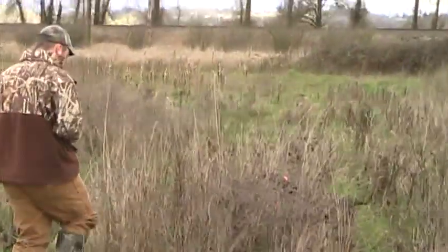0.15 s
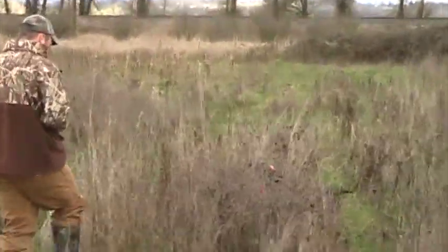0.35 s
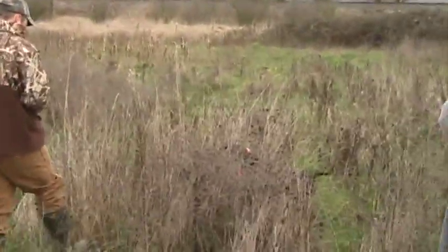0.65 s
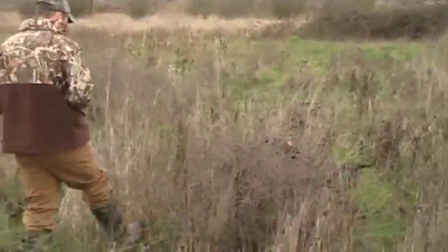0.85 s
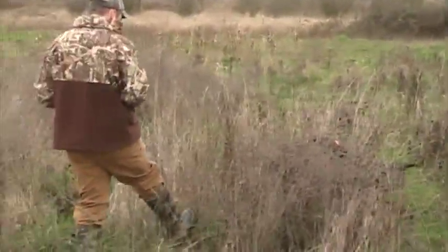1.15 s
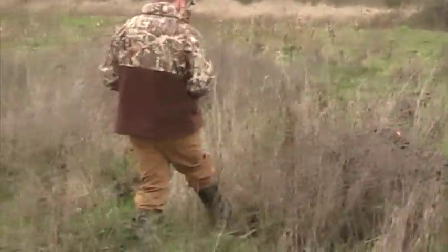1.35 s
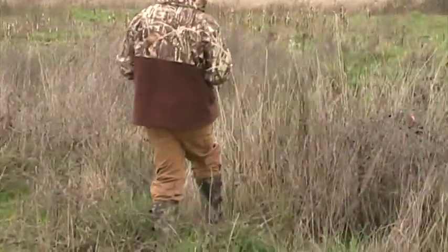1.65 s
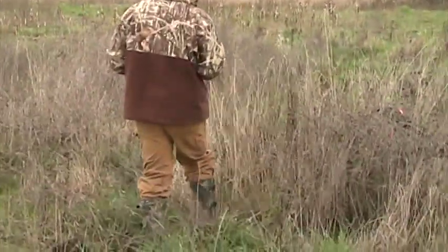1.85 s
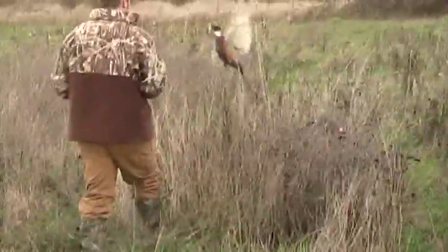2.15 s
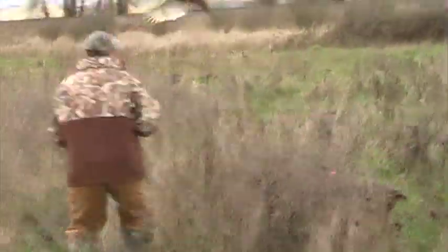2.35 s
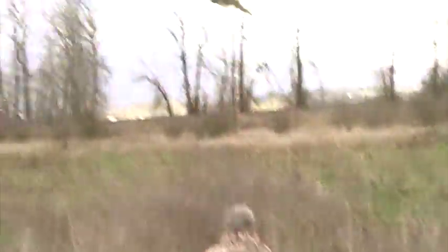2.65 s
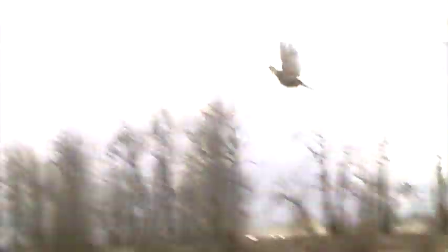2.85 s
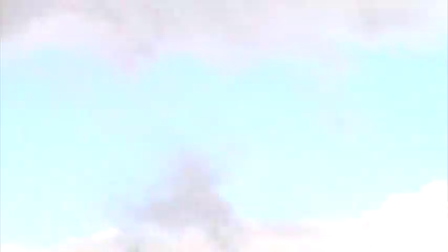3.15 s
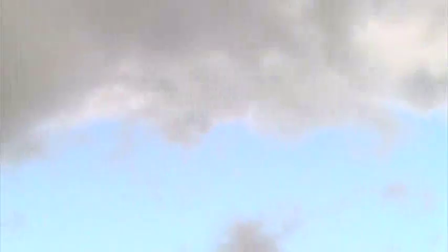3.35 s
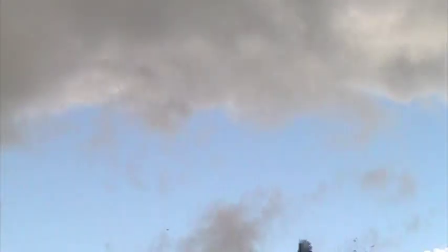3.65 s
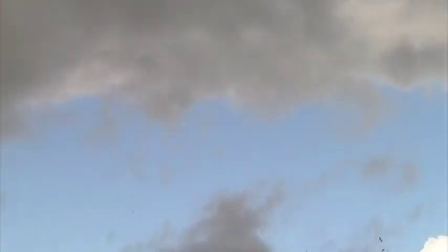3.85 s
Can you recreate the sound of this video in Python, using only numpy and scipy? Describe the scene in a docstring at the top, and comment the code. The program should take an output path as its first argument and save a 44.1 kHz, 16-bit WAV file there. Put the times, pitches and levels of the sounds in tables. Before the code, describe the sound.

Shotgun fires loudly in an open field, following crunching stems, a flushing pheasant and buffeting wind

```python
"""Pheasant flush and shotgun in dry grass

An open field with far hum and hiss: shaped noise, under a far small bird of gliding tones.
Close to the microphone a hunter wades through dry grass: grained noise swells and resonant snaps.
A pheasant thrashes free and beats away, each wing stroke whistling, swishing and flapping; wind buffets the ports.
A shotgun fires close by as bursts of noise, overloads the recorder and echoes; its metal rings as damped modes.
"""
import sys
import numpy as np
from scipy import signal
from scipy.fft import rfft, irfft
from scipy.io import wavfile

SR = 44100
rng = np.random.default_rng(int(sys.argv[2]) if len(sys.argv) > 2 else 0)


def master(y):
    """Save y as 16-bit WAV."""
    cut = np.clip(np.atleast_2d(y).T, -1, 1)
    pcm = np.round(cut * 32767)  # scale
    wavfile.write(sys.argv[1], SR, pcm.astype(np.int16))


N = 176400
T = np.arange(N) / SR


def amp(db):
    """Gain of a level in dB."""
    return 10 ** (np.asarray(db) / 20)


def unit(x):
    """Scale to rms 1."""
    return x / np.sqrt(np.mean(x ** 2) + 1e-20)


def level(rows):
    """Gain of a (time_s, level_db) curve, dropping to -120 dB outside it."""
    time_s, level_db = np.transpose(rows)
    return amp(np.interp(T, time_s, level_db, -120, -120))


def drift(rate):
    """Slow random wander of rms 1, smoothed by two poles at rate Hz."""
    pole = np.exp(-2 * np.pi * rate / SR)
    wander = signal.lfilter([1], [1, -2 * pole, pole * pole], rng.standard_normal(N + SR))
    return unit(wander[SR:])  # the first second lets the filter settle


def noise(colour, alike):
    """Stereo noise of a given spectrum and left-right likeness; the middle has rms 1."""
    log_hz = np.log(np.arange(N // 2 + 1) * SR / N + 1)

    def read(rows):
        hz, value = np.transpose(rows)
        return np.interp(log_hz, np.log(hz), value)

    likeness = np.clip(read(alike), -.9, .97)
    mid, side = rfft(rng.standard_normal((2, N))) * amp(read(colour))
    mid = irfft(mid, N)
    side = irfft(side * np.sqrt((1 - likeness) / (1 + likeness)), N)
    return np.array([mid + side, mid - side]) / np.std(mid)


def swell(start, rise, hold, t60):
    """Attack, hold, then a fall of 60 dB in t60 seconds."""
    t = T - start
    attack = np.clip(t / rise, 0, 1) ** 1.5
    return attack * amp(-60 * np.maximum(t - rise - hold, 0) / t60)


def band(x, hz, width):
    """One two-pole resonance, gain near 1 on top."""
    r = np.exp(-np.pi * width / SR)
    top = [(1 - r * r) / 2, 0, (r * r - 1) / 2]
    return signal.lfilter(top, [1, -2 * r * np.cos(2 * np.pi * hz / SR), r * r], x + 1e-18)


def twice(x, hz, width):
    """A steeper resonance from two in a row, rms 1."""
    return unit(band(band(x, hz, width), hz, width))


def pan(db):
    """Left and right gains that differ by db."""
    return amp([[db / 2], [-db / 2]])


# Even spectrum for all the unshaped air noise: pitch_hz, density_db per Hz
FLAT = [(100, 0)]


def bursts(rows, colour, alike, grain_db, body_db):
    """Noise swells in uneven millisecond grains; each has a resonant body, strongest at the crest."""
    grains = []
    for _ in range(2):
        wander = np.clip(drift(164), -3, 2.5)
        grains.append(amp(grain_db * wander - grain_db ** 2 / 11.6))  # offset for the power grains add
    wide = grains[0] * noise(colour, alike)
    air = noise(FLAT, alike)
    out = 0
    for start, rise, hold, t60, db, hz in rows:
        shape = swell(start, rise, hold, t60)
        body = grains[1] * twice(air, hz, 0.63 * hz)
        out = out + amp(db) * shape * (wide + amp(body_db) * shape * body)
    return out


def wind(curve, colour, alike, lump_db, edge_db):
    """Lumpy pressure noise, mostly opposite in the two ports; the upper part flares with strong buffets."""
    lumps = drift(35)
    rumble = noise(colour, [(100, alike)])
    top = signal.sosfilt(signal.butter(2, 350, "high", fs=SR, output="sos"), rumble)
    gain = level(curve)
    flare = amp(edge_db * np.clip(lumps, -2, 2)) * (gain / gain.max()) ** 1.05 * 2.0
    return gain * amp(lump_db * lumps + 1) * (rumble + top * (flare - 1))


# Distant hum and hiss across the field: pitch_hz, density_db per Hz
FIELD_COLOUR = [(120, -20), (200, -1), (371, -5.5), (940, -2.5), (2090, -16), (7090, -30.5), (15500, -52)]
# How alike the far field is at left and right: pitch_hz, likeness (1 same, -1 opposite)
FIELD_ALIKE = [(200, -0.14), (600, 0.63), (3000, -0.31)]
FIELD_DB = -51


def distant_field():
    """Steady far hum and hiss as shaped noise, its level wandering slightly."""
    return amp(FIELD_DB + 0.33 * drift(14)) * noise(FIELD_COLOUR, FIELD_ALIKE)


# Grass and cloth brushing near the microphone: time_s, level_db
RUSTLE = [(0, -48), (.35, -60), (1.1, -65), (1.33, -51), (1.55, -47), (1.75, -49), (1.87, -51.5),
          (2.15, -48.5), (2.6, -47.5), (2.85, -51), (3.53, -54)]
# Its spectrum: pitch_hz, density_db per Hz
RUSTLE_COLOUR = [(1000, -1), (2500, -3.5), (8000, -2.5), (12000, -10), (15500, -16)]
# Left-right likeness of brushing, gun and echoes: pitch_hz, likeness
SPREAD_ALIKE = [(300, 0.93), (1200, 0.97), (3000, 0.59), (7000, 0.7), (14000, -0.011)]


def rustle():
    """Many light brushes blur into noise that follows the level curve."""
    return level(RUSTLE) * amp(0.5 * drift(18)) * noise(RUSTLE_COLOUR, SPREAD_ALIKE)


# Light wind on the microphone ports: time_s, relative_level_db
BREEZE = [(0, -50), (.3, -51.5), (.45, -45), (.6, -47), (.9, -56), (1.15, -55.5), (1.27, -46), (1.42, -57),
          (1.52, -43.5), (1.74, -40), (1.84, -56), (2.05, -42.5), (2.2, -58), (2.27, -48), (2.52, -52),
          (2.62, -44), (2.8, -61)]
# Its spectrum: pitch_hz, density_db per Hz
BREEZE_COLOUR = [(15, -15.5), (60, 8), (120, 1.5), (200, -9), (400, -48)]


def breeze():
    """Light turbulence makes low pressure noise, only a little opposed between the ports."""
    return wind(BREEZE, BREEZE_COLOUR, -0.21, lump_db=2.0, edge_db=7.0)


# Stems crushed underfoot, close: start_s, rise_s, hold_s, fall_t60_s, relative_level_db, body_hz
STEPS = [(.069, 0.0017, 0.0024, 0.096, -21, 890), (.078, 0.018, 0.0083, 0.07, -23.5, 590),
         (.2, 0.0015, 0.0034, 0.038, -25, 710), (.21, 0.009, 0.013, 0.1, -33, 710)]
# Their spectrum: pitch_hz, density_db per Hz
STEP_COLOUR = [(50, -27), (150, -0.5), (250, -6), (450, -1.5), (900, -11.5), (2500, -9.5), (9000, -14),
               (15500, -42)]
# Left-right likeness of sources near the microphone: pitch_hz, likeness
NEAR_ALIKE = [(100, 1), (600, 1), (5000, 0.91), (15000, 0.59)]


def steps():
    """Crushed stems crackle as grained noise around a body resonance."""
    return bursts(STEPS, STEP_COLOUR, NEAR_ALIKE, grain_db=4.0, body_db=-9)


# Single stems snapping close by: start_s, relative_level_db, pitch_hz, left_right_db
SNAPS = [(0.0712, -11, 1480, 14), (0.084, 0.5, 444, 3), (0.0987, -1, 4100, 9), (0.106, -8, 420, 3),
         (0.1938, -11.5, 520, 6), (0.2039, -12, 3000, 7), (0.2224, -13.5, 8750, 8),
         (1.7954, -22.5, 1500, 11), (2.115, -23, 5000, -1), (2.232, -21.5, 5470, 0),
         (2.5195, -21.5, 2300, 11), (2.727, -16, 4240, 8), (2.9826, -15, 5800, 5), (3.325, -35, 3000, 2.5),
         (3.359, -31, 6000, 2.5)]


def snaps():
    """A stem breaks as a sharp impulse and a wisp of noise through a wide resonance."""
    air, out = noise(FLAT, NEAR_ALIKE), 0
    for start, db, hz, left_right in SNAPS:
        impulse = np.arange(N) == int(start * SR) + 30
        kick = 4 * impulse + .6 * swell(start, .0006, 0, t60=0.014) * air
        ring = np.sqrt(9000 / hz) * band(kick, hz, 0.73 * hz)
        out = out + amp(db - 9) * pan(left_right) * (ring + hz / 6000 * kick)
    return out


# Far small bird: start_s, length_s, first_hz, last_hz, relative_level_db
SONG = [(0.847, 0.065, 3980, 3940, -62.5), (0.962, 0.125, 3920, 3960, -64), (1.15, 0.084, 3930, 4350, -62)]


def songbird():
    """Thin whistles glide from first to last pitch along an upward bow."""
    out = 0
    for start, length, first_hz, last_hz, db in SONG:
        u = np.clip((T - start) / length, 0, 1)  # progress through the whistle
        pitch = first_hz + (last_hz - first_hz) * u + 500 * u * (1 - u)
        phase = 2 * np.pi * np.cumsum(pitch) / SR
        out = out + amp(db + 3.5 * drift(40)) * 9 * u ** 1.55 * (1 - u) * np.sin(phase)
    return out


# Stems swept aside near the microphone by a boot, then by the bird tearing free:
# start_s, rise_s, hold_s, fall_t60_s, relative_level_db, body_hz
THRASH = [(1.185, 0.076, 0.012, 0.19, -33.5, 1620), (1.88, 0.025, .01, 0.17, -43, 1500),
          (1.93, 0.012, 0.032, 0.2, -35, 3000), (1.995, 0.012, 0.019, 0.15, -34, 970),
          (2.045, 0.0043, 0.028, 0.12, -34, 2550), (2.13, 0.013, 0.012, 0.029, -36, 1500),
          (2.16, 0.0064, 0.012, 0.06, -40, 2600)]
# Their spectrum: pitch_hz, density_db per Hz
THRASH_COLOUR = [(120, 4.5), (500, -3.5), (1800, -3.5), (3000, -8), (9000, -7), (15500, -16.5)]


def thrash():
    """Stems swept aside hiss in grained swells around a body resonance."""
    return bursts(THRASH, THRASH_COLOUR, NEAR_ALIKE, grain_db=3.0, body_db=-5)


# Metal parts of the nearby gun click: start_s, relative_level_db, lowest_mode_db
CLICKS = [(1.5915, -11, -5.5), (1.6182, -20, -18), (1.68, -21, -12), (3.8008, -16.5, -17),
          (3.8167, -12.5, -22), (3.8335, -13, -12), (3.8421, 4, -7.5), (3.8466, -8, -7)]
# Damped modes of the action: pitch_hz, relative_level_db, width_hz
ACTION = [(1500, -2.5, 730), (3540, -9.5, 1200), (5330, -8.5, 2200), (6980, -4, 980), (12400, -27, 8500)]
CLICK_DB, CLICK_T60_S = -10, 0.019
TAIL_DB, TAIL_T60_S = -21, 0.14  # the tail's level is relative to the crack


def gun_metal():
    """Each click is a short crack of noise with a faint tail, through the damped modes of the action."""
    air, out = noise(FLAT, SPREAD_ALIKE), 0
    modes = [unit(band(air, hz, width)) * amp(db) for hz, db, width in ACTION]
    upper_modes = unit(sum(modes[1:]))
    for start, db, low_db in CLICKS:
        crack = swell(start, 0.00052, 0, CLICK_T60_S)
        tail = amp(TAIL_DB) * swell(start, 0.015, 0, TAIL_T60_S)
        out = out + amp(db + CLICK_DB) * (crack + tail) * (amp(low_db) * modes[0] + upper_modes)
    return out * pan(-1.6)


# Air rush of the climbing bird: time_s, relative_level_db
FLIGHT = [(1.84, -52.5), (1.95, -44), (2.15, -40.5), (2.6, -44), (3.4, -46)]
# Its spectrum: pitch_hz, density_db per Hz
FLIGHT_COLOUR = [(150, 0.5), (300, -3.5), (500, 1), (1000, -3), (1600, -7.5), (3000, -27.5)]


def air_rush():
    """Air torn by the climbing bird is shaped noise with an unsteady level."""
    return level(FLIGHT) * amp(2.2 * drift(26)) * noise(FLIGHT_COLOUR, NEAR_ALIKE)


# Wing strokes of the bird: start_s, relative_level_db, whistle_hz, flap_level_db
BEATS = [(2.2478, -27, 3160, -39.5), (2.336, -30.5, 2890, -29), (2.424, -30.5, 2960, -38),
         (2.511, -29.5, 2920, -35.5), (2.6042, -34.5, 2780, -34.5), (2.6938, -34.5, 2570, -60),
         (2.7843, -34, 2770, -36), (2.864, -35, 2860, -47), (2.9585, -37.5, 3000, -36.5),
         (3.0446, -35.5, 2960, -35.5), (3.1365, -36, 2890, -31.5), (3.234, -45, 2980, -50)]
# Two hollow tones of the flap, before scatter: pitch_hz
FLAP_HZ = [451, 960]
FLAP_SCATTER = 0.057  # spread of each flap tone, as a fraction of its pitch
FLAP_LAG_S, FLAP_RISE_S, FLAP_T60_S = 0.0082, 0.01, 0.034
STROKE_DB, STROKE_RISE_S = -10.5, 0.0012
WHISTLE_WIDTH_HZ, WHISTLE_T60_S = 320, .06
SWISH_DB, SWISH_HZ, SWISH_T60_S = 1.2, 2200, 0.15


def wings():
    """Each stroke whistles through the feathers with octave flutter and swish, then flaps as tone and air."""
    air, out = noise(FLAT, NEAR_ALIKE), 0
    puff = unit(sum(twice(air, hz, 200) for hz in FLAP_HZ))
    swish = twice(air, SWISH_HZ, 1840) * amp(4.0 * drift(136))
    scatter = FLAP_SCATTER * rng.standard_normal((len(BEATS), len(FLAP_HZ)))
    pitches = np.array(FLAP_HZ) * (1 + scatter)
    for (start, db, hz, flap_db), tones in zip(BEATS, pitches):
        whistle = twice(air, hz, WHISTLE_WIDTH_HZ) + .45 * twice(air, 2 * hz, 1200)
        whistle = whistle * swell(start, STROKE_RISE_S, 0.0031, WHISTLE_T60_S)
        sweep = amp(SWISH_DB) * swish * swell(start, STROKE_RISE_S, 0.0034, SWISH_T60_S)
        out = out + amp(db + STROKE_DB) * (whistle + sweep)
        flap = 0.49 * puff + np.sin(2 * np.pi * np.outer(tones, T)).sum(axis=0)
        out = out + amp(flap_db) * swell(start + FLAP_LAG_S, FLAP_RISE_S, 0, FLAP_T60_S) * flap
    return out


# Strong buffeting at the microphone ports: time_s, relative_level_db
GUST = [(2.76, -50), (2.855, -34.5), (2.9, -25), (2.935, -31), (3.02, -27.5), (3.07, -22), (3.135, -29),
        (3.16, -23), (3.26, -25.5), (3.295, -42), (3.33, -28.5), (3.41, -26), (3.47, -31.5), (3.52, -28),
        (3.575, -56.5), (3.7, -36), (3.88, -33.5), (4, -27.5)]
# Its spectrum: pitch_hz, density_db per Hz
GUST_COLOUR = [(20, -20), (55, -4.5), (150, -1.5), (310, -10.5), (800, -46.5), (2000, -85)]


def gust():
    """Strong turbulence makes low pressure noise, mostly opposite in the two ports."""
    return wind(GUST, GUST_COLOUR, -0.8, lump_db=2.5, edge_db=3.0)


# Single eddies on the microphone ports: centre_s, relative_level_db, pitch_hz
THUMPS = [(2.826, -15.5, 91.5), (2.956, -13.5, 150), (3.0, -14.5, 94), (3.073, -14.5, 109),
          (3.208, -9, 141), (3.338, -15.5, 92)]
THUMP_CYCLES, THUMP_SIDE_DB, THUMP_SQUARE = 0.57, 8, 8.0  # bell width, side over middle, squaring


def thumps():
    """A couple of pressure swings, squared off the more the stronger, nearly opposite in the two ports."""
    out = 0
    for centre, db, hz in THUMPS:
        turns = hz * (T - centre)
        drive = THUMP_SQUARE * amp(db)
        bell = np.exp(-(turns / THUMP_CYCLES) ** 2)
        swings = np.array([np.cos(2 * np.pi * turns), np.sin(2 * np.pi * turns)])
        mid, side = np.tanh(drive * bell * swings) / np.tanh(drive)
        out = out + amp(db) * (amp(THUMP_SIDE_DB) * side * [[1], [-1]] - mid)
    return out


# Close blast and first tail: start_s, rise_s, hold_s, fall_t60_s, relative_level_db, body_hz
BLAST = [(3.5335, 0.0029, 0.0057, 0.039, -3.5, 2200), (3.54, 0.0062, 0.013, 0.46, -23.5, 1700)]
# Their spectrum: pitch_hz, density_db per Hz
BLAST_COLOUR = [(60, -16), (240, 0), (1600, -5), (6000, -9), (9000, -9), (15500, -25)]


def blast():
    """The charge bursts out as an abrupt noise swell with a weaker, longer tail."""
    return bursts(BLAST, BLAST_COLOUR, SPREAD_ALIKE, grain_db=2.1, body_db=-6.5)


def ground_return():
    """The ground returns the shot as a dull thud of resonant noise, the same in both ports."""
    thud = twice(rng.standard_normal(N), hz=515, width=380)
    return amp(-27.5) * thud * swell(3.545, rise=0.011, hold=0.018, t60=0.63)


# Returns from the tree lines: start_s, rise_s, hold_s, fall_t60_s, relative_level_db, body_hz
ECHO = [(3.632, 0.01, 0.038, 0.28, -24.5, 1680), (3.7, 0.091, .3, .3, -36.5, 2000),
        (3.82, 0.058, 0.038, 0.48, -32.5, 2800)]
# Their spectrum: pitch_hz, density_db per Hz
ECHO_COLOUR = [(1000, -8.5), (1350, -3.5), (2200, 0), (3500, -2), (5000, -5), (8000, -9), (15500, -35.5)]


def echoes():
    """Tree lines scatter the shot back as softer, slower noise swells."""
    return bursts(ECHO, ECHO_COLOUR, SPREAD_ALIKE, grain_db=1.3, body_db=0.5)


def scene():
    """Sum of field, hunter, birds, wind and gun."""
    grass = rustle() + steps() + snaps()
    pheasant = thrash() + air_rush() + wings()
    ports = breeze() + gust() + thumps()
    shot = blast() + ground_return() + echoes()
    return distant_field() + grass + songbird() + pheasant + gun_metal() + ports + shot


def record(dry):
    """Hard overload towards full scale, then a steep cut of the top."""
    clipped = dry / (1 + np.abs(dry) ** 8) ** (1 / 8)
    top_cut = signal.ellip(8, .5, 30, 15600, fs=SR, output="sos")  # ripple dB, stopband dB, cutoff Hz
    return signal.sosfilt(top_cut, clipped)


dry = scene()
out = record(dry)
master(out)
```